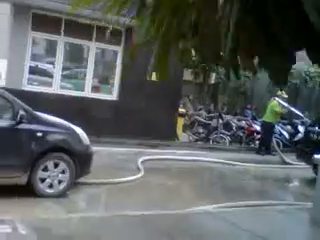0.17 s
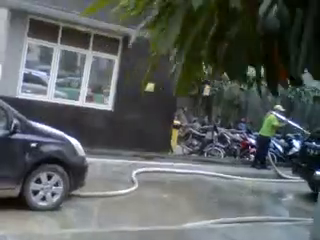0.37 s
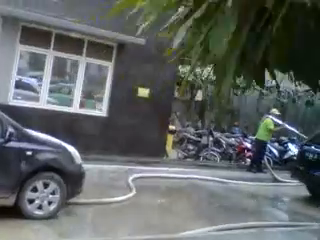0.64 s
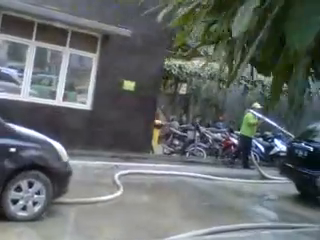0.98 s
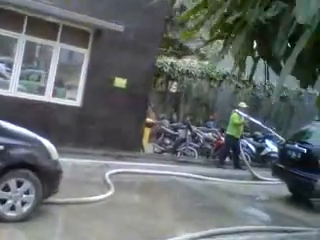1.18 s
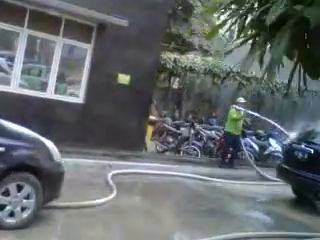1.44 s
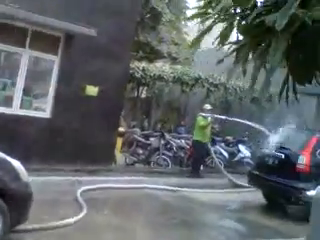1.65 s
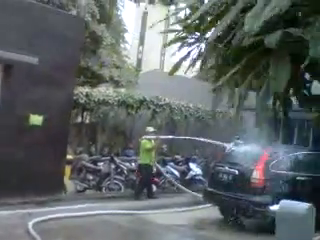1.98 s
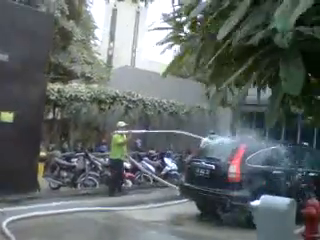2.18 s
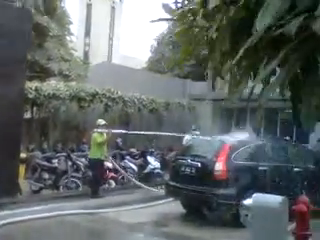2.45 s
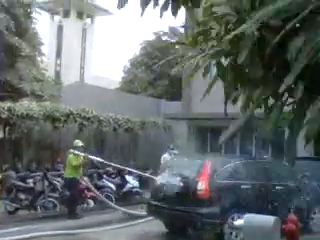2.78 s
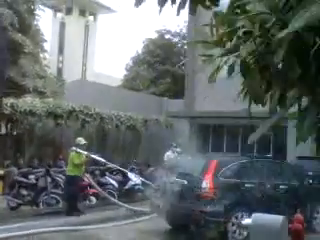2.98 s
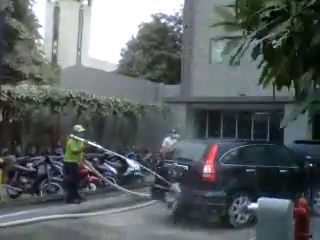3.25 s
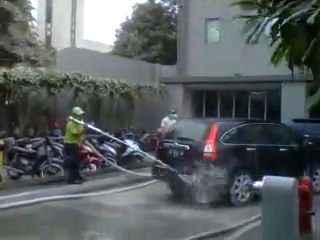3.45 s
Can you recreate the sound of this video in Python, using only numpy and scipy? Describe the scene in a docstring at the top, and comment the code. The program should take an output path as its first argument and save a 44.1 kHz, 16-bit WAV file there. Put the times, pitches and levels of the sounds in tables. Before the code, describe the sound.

A strong hose jet hisses and drums on a car in a slightly echoing yard, with a faint pump rumble behind it. The spray starts soft, then grows louder from about 1.2 seconds, sputtering in short flares. Two small dull knocks sound at about 0.8 and 1.7 seconds. From 3 seconds the water is loudest, booming on the panels, then splattering on the bumper and wet ground until 3.6 seconds.

```python
"""A strong jet from a hose washes a car across a walled yard.
The spray hisses and sputters and the jet drums on the body, growing louder as the one microphone
turns towards it. Then the jet drops to the bumper and splatters on the wet ground.
A pump rumbles behind it and two small knocks sound nearby. Water and knocks echo in the yard."""
import sys
import numpy as np
from scipy import signal
from scipy.fft import rfft, irfft
from scipy.io import wavfile
from scipy.ndimage import uniform_filter1d

SR = 44100
rng = np.random.default_rng(int(sys.argv[2]) if len(sys.argv) > 2 else 0)


def dump(signal):
    """Clip the signal to [-1, 1] and save it as 16-bit WAV at the path in sys.argv[1]."""
    limited = np.clip(np.atleast_2d(signal).T, -1, 1)
    pcm = np.round(limited * 32767).astype(np.int16)
    wavfile.write(sys.argv[1], SR, pcm)


N = 159642
TIME = np.arange(N) / SR
FREQS = np.fft.rfftfreq(N, 1 / SR)


def amp(db):
    """Turns decibels into a number to multiply a sound by."""
    return 10 ** (np.asarray(db) / 20)


def unit(x):
    """Scales a signal to an average strength (rms) of one."""
    return x / np.sqrt(np.mean(x ** 2) + 1e-20)


def level(points):
    """A volume curve that joins points of time in seconds and level in dB."""
    return amp(np.interp(TIME, *np.transpose(points)))


def read(points, hz):
    """Looks up a value between a table's frequencies, spaced by octaves."""
    f, value = np.transpose(points)
    return np.interp(np.log(hz + 1), np.log(np.sort(f) + 1), value)


def colour(x, points):
    """Turns a sound's frequencies up or down, then scales it to strength one."""
    return unit(irfft(rfft(x) * amp(read(points, FREQS)), N))


def band(spectrum, hz, width):
    """The sound of a spectrum with only the part around one pitch kept, at strength one."""
    return unit(irfft(spectrum / (1 + (2 * (FREQS - hz) / width) ** 4), N))


def wander(rate_hz):
    """A smooth random wobble, up to about the given rate."""
    spectrum = rfft(rng.standard_normal(N))
    return unit(irfft(spectrum * np.exp(-(FREQS / rate_hz) ** 2) * (FREQS > 1), N))


def drops(per_s, spread_db, mist, patchy_db):
    """Drops of uneven size land in a mist of tiny ones, clumped in time and pitch."""
    hits = (rng.random(N) < per_s / SR) * rng.choice([-1, 1], N)
    sizes = amp(spread_db * np.minimum(rng.exponential(1, N), 4))
    water = unit(hits * sizes) + mist * rng.standard_normal(N)
    grid = signal.stft(water, nperseg=512, noverlap=384)[2]  # pitch by time
    patches = uniform_filter1d(rng.standard_normal(grid.shape), size=7, axis=0)
    patches = uniform_filter1d(patches, size=10, axis=1)
    clumped = grid * amp(patchy_db * unit(patches))
    return unit(signal.istft(clumped, nperseg=512, noverlap=384)[1][:N])


def swells(rows, water):
    """Water noise rises and falls briefly, each time around its own pitch."""
    spectrum = rfft(water)
    return sum(amp(db) * band(spectrum, hz, width) * np.exp(-2 * ((TIME - peak) / length) ** 2)
               for peak, length, db, hz, width in rows)


def spray():
    """Fine drops hiss, sputter as the jet breaks up, and flare off edges."""
    # How loud the hiss is. Each row: time in seconds, relative level in dB.
    hiss_level = [(0, -41.5), (.42, -44), (.53, -41.5), (.66, -43.5), (.88, -44), (1.1, -44), (1.15, -39),
                  (1.25, -34), (1.32, -40), (1.42, -37.5), (1.505, -33), (1.56, -39.5), (1.61, -35),
                  (1.78, -36), (2.0, -37.5), (2.06, -36), (2.14, -37), (2.39, -34), (2.5, -35.5),
                  (2.7, -33), (2.88, -32), (2.98, -32.5), (3.03, -30.5), (3.12, -33), (3.62, -32)]
    # The tone of fine spray. Each row: frequency in Hz, relative level in dB.
    hiss_tone = [(300, -34), (2000, -20), (2800, -17), (3300, -9), (4020, -7), (4150, 1.5), (5400, 1),
                 (5950, -2.5), (6800, -2), (7250, -10)]
    # The jet catches an edge.
    # Each row: peak time and length in seconds, relative level in dB, pitch and band width in Hz.
    flares = [(1.222, 0.04, -51, 3000, 1000), (1.226, 0.034, -35.5, 4070, 1160),
              (1.26, 0.03, -34, 4970, 1800), (1.655, 0.04, -40, 6060, 1770), (3.03, 0.03, -36, 5530, 2400),
              (3.45, .12, -47, 6430, 250)]
    water = drops(per_s=5400, spread_db=2, mist=0.97, patchy_db=1.2)
    sputter = amp(0.99 * wander(rate_hz=90))
    hiss = colour(water, hiss_tone) * sputter * level(hiss_level)
    return hiss + swells(flares, rng.standard_normal(N))


def drumming():
    """Lumps of water beat on the car's panels and boom in hollow parts."""
    # How loud the drumming is. Each row: time in seconds, relative level in dB.
    drum_level = [(0, -49), (.7, -47.5), (1.17, -46.5), (1.24, -44.5), (1.44, -41.5), (1.56, -45),
                  (1.8, -44), (2.05, -43.5), (2.35, -42), (2.68, -43), (2.97, -40), (3.02, -38),
                  (3.18, -35.5), (3.26, -39.5), (3.36, -38), (3.62, -37)]
    # The tone of the panels. Each row: frequency in Hz, relative level in dB.
    panel_tone = [(100, -4), (220, 2), (360, 1.5), (500, -2.5), (660, -2.2), (800, -1.5), (1020, 1),
                  (1200, -2), (1500, -0.5), (1850, -7.5), (2300, -8.5), (2750, -18), (4000, -20.5)]
    # The jet finds a hollow part.
    # Each row: peak time and length in seconds, relative level in dB, pitch and band width in Hz.
    hollows = [(.66, 0.11, -57, 1010, 80), (.94, 0.09, -50.5, 1010, 80), (1.3, 0.054, -49, 1380, 420),
               (1.415, 0.073, -43.5, 1380, 240), (1.39, 0.07, -45.5, 706, 299),
               (1.42, 0.054, -43, 300, 220), (2.46, 0.1, -47.5, 1270, 450), (3.05, 0.042, -38, 1160, 190),
               (3.145, .055, -36.5, 1165, 280), (3.175, 0.052, -38.5, 1420, 300),
               (3.16, 0.073, -45, 600, 550), (3.57, 0.04, -39, 720, 400)]
    water = drops(per_s=2000, spread_db=1.0, mist=0.73, patchy_db=2.06)
    lumps = amp(0.62 * wander(rate_hz=45))
    drum = colour(water, panel_tone) * lumps * level(drum_level) * amp(-0.5)
    return drum + swells(hollows, rng.standard_normal(N))


def pump():
    """The pump makes a low rumble with a few wavering tones."""
    # How loud the pump is. Each row: time in seconds, relative level in dB.
    pump_level = [(0, -49.5), (.28, -43), (.88, -47.5), (1.15, -42), (1.65, -42), (1.87, -44.5),
                  (2.28, -40), (2.85, -42.5), (3.2, -37), (3.62, -37)]
    # The tone of the rumble. Each row: frequency in Hz, relative level in dB.
    rumble_tone = [(12, -13.5), (28, 2), (60, -3), (90, 2.5), (120, 1.5), (160, -1), (230, -8.5),
                   (400, -22), (900, -38.5)]
    # The tones it hums. Each row: pitch in Hz, relative level in dB.
    hum_tones = [(44.3, -11), (132.5, -11.5), (159, -19.5), (222, -19)]
    wavering_time = np.cumsum(1 + 0.01 * wander(rate_hz=6.7)) / SR  # pitch strays by about 1%
    hum = np.zeros(N)
    for hz, db in hum_tones:
        strength = np.sqrt(2) * amp(db + 2.5 * wander(rate_hz=3.6))
        hum += strength * np.sin(2 * np.pi * (hz * wavering_time + rng.random()))
    rumble = amp(-1.0) * colour(rng.standard_normal(N), rumble_tone)
    return (rumble + hum) * level(pump_level)


def yard(x):
    """The yard's blurred echo, which dies fastest in the low notes."""
    # How long the echo lasts. Each row: frequency in Hz, seconds to fade by 60 dB.
    fade_times = [(100, 0.07), (1000, .5), (7000, 0.94)]
    hz, t, noise = signal.stft(rng.standard_normal(SR // 2), SR, nperseg=256)
    fade = np.exp(-np.log(1000) * t / read(fade_times, hz)[:, None])
    tail = signal.istft(noise * fade, nperseg=256)[1]
    return signal.fftconvolve(x, tail / np.linalg.norm(tail))[:N]


def knocks():
    """Two dull knocks, each with a small bright tick, bounce back off the walls."""
    # The knocks. Each row: time in seconds, level in dB, pitch in Hz, half-length in seconds,
    # tick level in dB compared with the knock, tick pitch in Hz.
    hits = [(0.7820, -25, 730, 0.0009, -10, 1550), (1.719, -22.5, 1270, 0.00068, -8, 3270)]
    # Echoes off the walls. Each row: delay in seconds, level change in dB.
    walls = [(.0027, -13), (.0085, -16), (.019, -21)]
    direct_path = (0.0009, 0.0082)  # same columns as the walls
    tick_half_s = 0.0009
    out = np.zeros(N)
    for when, db, hz, half_s, tick_db, tick_hz in hits:
        for delay, path_db in [direct_path] + walls:
            t = TIME - when - delay
            body = np.exp(-(t / half_s) ** 2) * np.sin(2 * np.pi * hz * t)
            tick = np.exp(-(t / tick_half_s) ** 2) * np.sin(2 * np.pi * tick_hz * t)
            out += amp(db + path_db) * (body + amp(tick_db) * tick)
    return out + amp(-8) * yard(out)


def slaps():
    """Single lumps of water burst at once and their spray dies away."""
    # The bursting lumps. Each row: start in seconds, relative level in dB,
    # pitch and band width in Hz, fade time in seconds.
    lumps = [(1.072, -44.5, 2210, 444, .012), (1.340, -36.5, 4650, 900, 0.0093),
             (1.352, -38, 980, 1000, .005), (1.470, -37, 1370, 600, .008), (1.593, -32.5, 5500, 2580, .012),
             (1.661, -31.5, 5500, 2630, 0.012), (2.109, -28.5, 5230, 2610, 0.0069),
             (2.770, -35, 4960, 1970, 0.016), (2.998, -26, 4820, 2220, 0.018),
             (3.168, -29, 1480, 600, 0.0074), (3.319, -27.5, 5440, 900, 0.0082),
             (3.428, -31, 4800, 1200, .011)]
    rise_s = 0.0018
    out = np.zeros(N)
    for start, db, hz, width, fade_s in lumps:
        age = np.maximum(TIME - start, 0)
        burst = band(rfft(rng.standard_normal(N)), hz, width)
        out += amp(db) * burst * (1 - np.exp(-age / rise_s)) * np.exp(-age / fade_s)
    return out


def splatter():
    """Heavy drops crackle on the bumper and wet ground, and make the car's trim ring."""
    # The splatter is faint until near the end. Each row: time in seconds, relative level in dB.
    splatter_level = [(0, -59), (2.5, -57), (2.85, -49), (3.05, -41.5), (3.28, -34), (3.48, -32.5),
                      (3.62, -33)]
    # The tone of heavy drops. Each row: frequency in Hz, relative level in dB.
    splatter_tone = [(150, -10.5), (350, -6.5), (700, -3.5), (1250, -9), (1650, -2), (2000, -5),
                     (2300, -1.5), (2600, -6), (2800, -2.5), (3300, 0), (3700, -2), (4100, -7.5),
                     (5000, -8), (7000, -14)]
    # The jet sweeps over pieces of trim.
    # Each row: peak time and length in seconds, relative level in dB, pitch and band width in Hz.
    trim_rings = [(3.33, 0.064, -38.5, 1580, 520), (3.52, .08, -46.5, 1600, 220),
                  (3.3, 0.079, -45.5, 2180, 260), (3.43, 0.04, -37, 2270, 230),
                  (3.53, 0.035, -36.5, 2200, 210), (3.27, 0.13, -39, 3220, 330), (3.49, .1, -38, 3250, 430)]
    water = drops(per_s=3000, spread_db=4, mist=0.53, patchy_db=0.6)
    on_trim = drops(per_s=4000, spread_db=3.5, mist=0.64, patchy_db=1.5)
    crackle = amp(-2.0) * colour(water, splatter_tone) * level(splatter_level)
    return crackle + swells(trim_rings, on_trim)


def scene():
    """Water, pump and knocks in the yard, the same in both channels."""
    water = spray() + drumming() + splatter() + slaps()
    echo = amp(-9) * yard(water)
    mono = amp(1.5) * (water + echo) + pump() + knocks()
    return np.array([mono, mono])


def record(dry):
    """Cuts off the highest treble sharply."""
    cutoff_hz = 7320
    low_pass = signal.firwin(801, cutoff_hz, window=("kaiser", 9), fs=SR)
    return signal.oaconvolve(dry, low_pass[None], "same")


dry = scene()
out = record(dry)
dump(out)
```